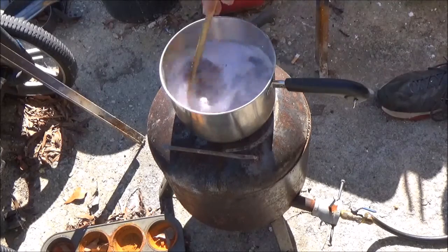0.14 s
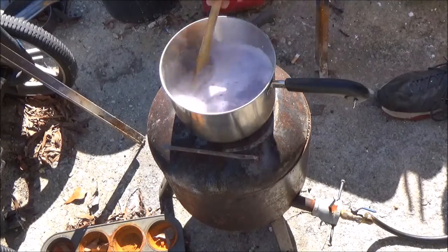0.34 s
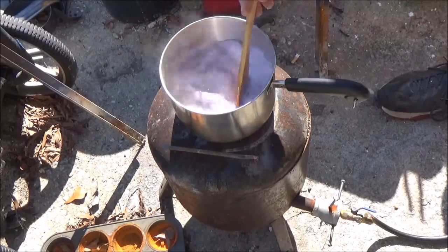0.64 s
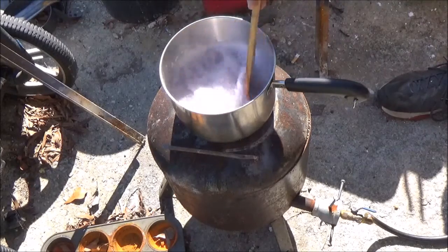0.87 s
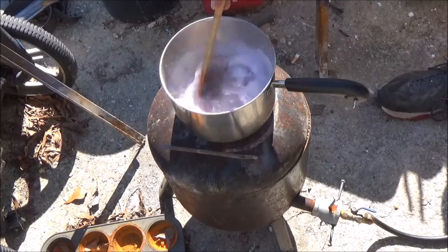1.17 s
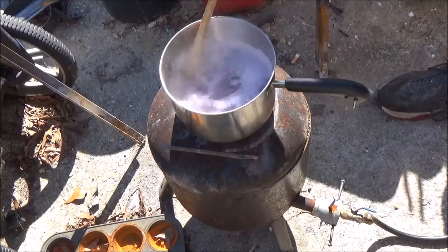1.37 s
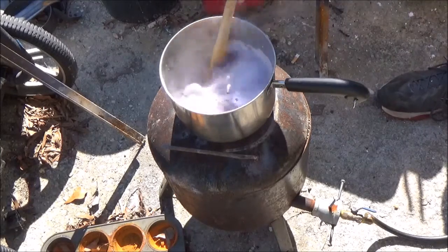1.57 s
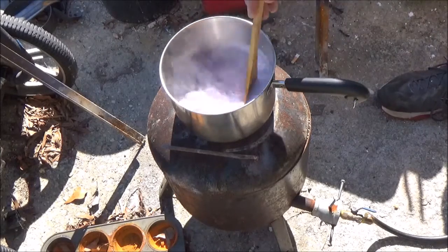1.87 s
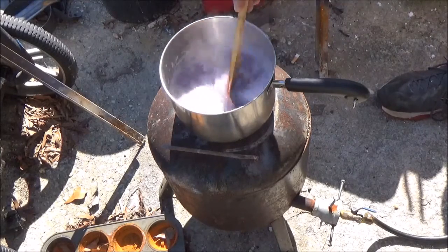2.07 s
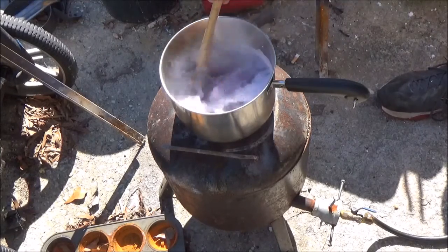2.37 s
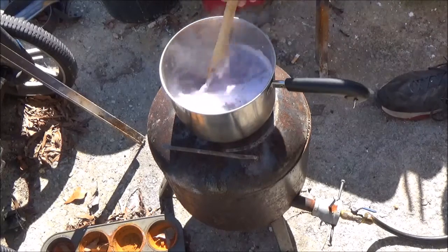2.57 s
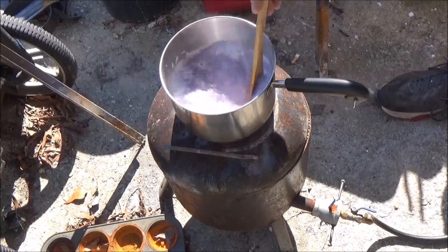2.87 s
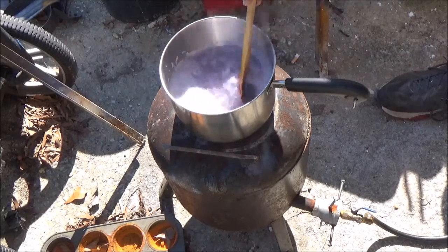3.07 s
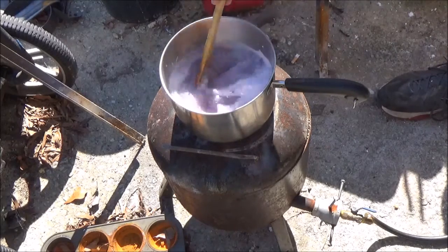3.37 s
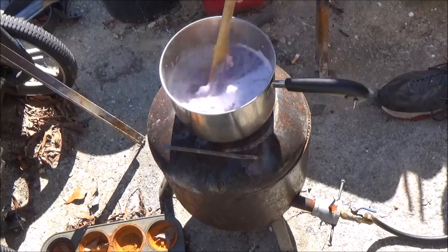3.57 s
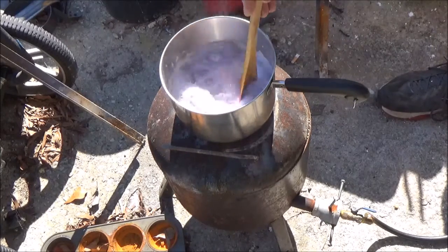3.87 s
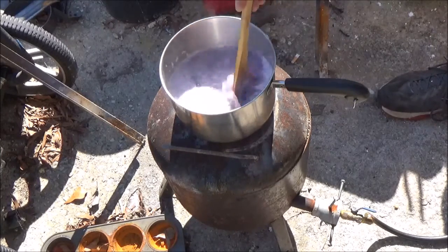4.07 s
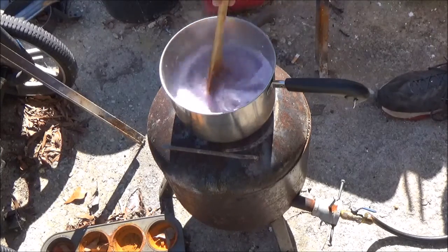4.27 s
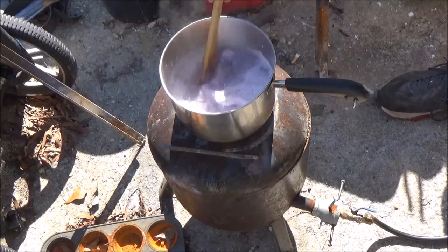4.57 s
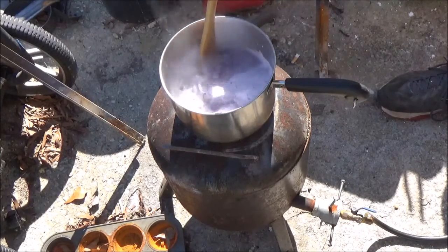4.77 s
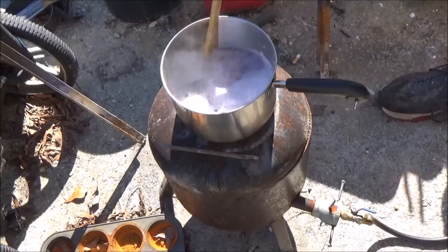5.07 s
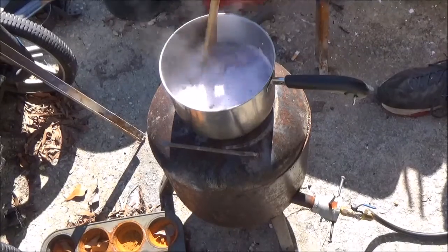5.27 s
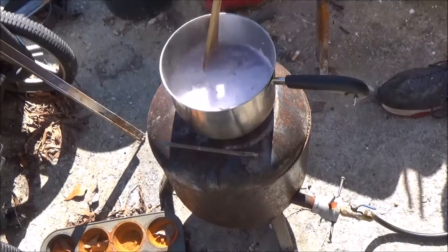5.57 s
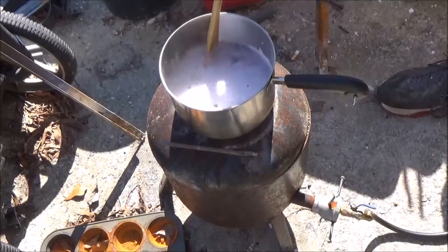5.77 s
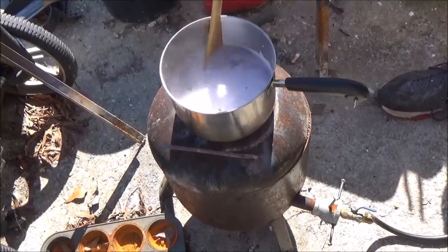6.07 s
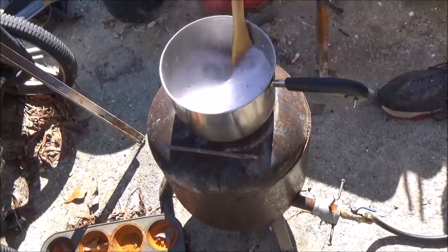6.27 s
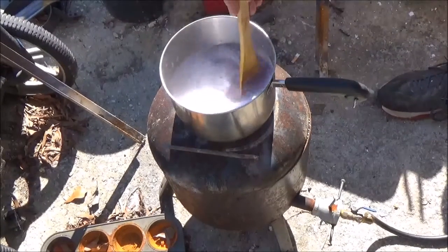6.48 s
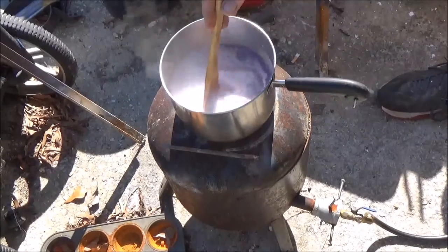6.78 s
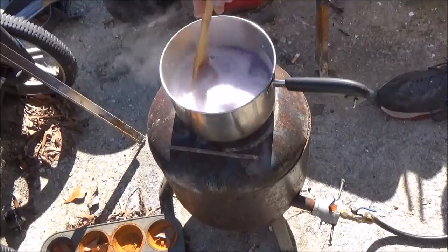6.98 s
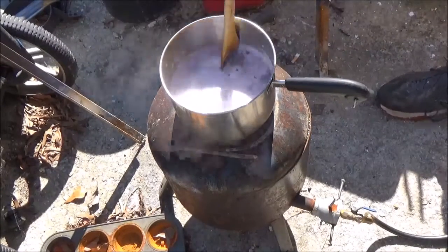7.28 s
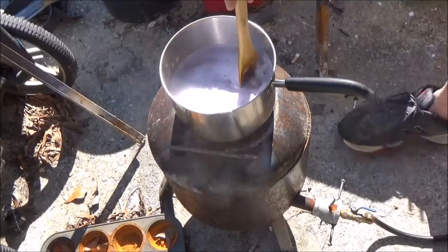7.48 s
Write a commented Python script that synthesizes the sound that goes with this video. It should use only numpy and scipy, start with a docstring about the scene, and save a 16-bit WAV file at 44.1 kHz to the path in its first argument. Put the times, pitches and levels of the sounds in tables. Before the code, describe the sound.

Throughout about 7.6 seconds, a propane burner roars close by in an open yard, slightly to the right. The flame rings its steel drum with a hollow, noisy tone a little above 1 kHz, fluttering and surging in quick uneven puffs, over steady low rumble and a patchy gas hiss. From 1.3 s a wooden spoon ticks lightly on the full saucepan, with a firmer, short damped knock at 2.6 s and small taps at 2.9 and 3.3 s. Narrow, soft stirring swishes rise around 3.8 and 4.8 s, while the flame spits brightly between 4 and 5.5 s. Sharp plastic clicks of the handheld camera crack at about 5.05 and 5.27 s. Spoon taps follow at 5.5 and 5.8 s. After 6 s, grainy shoe scuffs on concrete blend with longer stirring strokes; a crisp spoon tick lands at 7.2 s, a weaker one at 7.5 s, the roar still going.

```python
"""Heard close by in a yard: a propane burner roars under a saucepan throughout. Its fluttering flame rings
the steel drum around it as filtered noise and single puffs, over noise rumbles and the gas jet's hiss.
From about 1.3 s a wooden spoon ticks on the pan, with decaying sine knocks, and stirs in narrow noise strokes.
At 5 s the case of the hand-held camera clicks in short noise cracks; after 6 s a shoe shuffles on the
concrete in grainy noise swells."""
import sys
import numpy as np
from scipy import signal
from scipy.fft import rfft, irfft, next_fast_len
from scipy.io import wavfile
from scipy.ndimage import uniform_filter1d, map_coordinates

SR = 44100
rng = np.random.default_rng(int(sys.argv[2]) if len(sys.argv) > 2 else 0)


def store_pcm(level_fs):
    """Save levels as 16-bit WAV."""
    pcm = np.round(np.clip(level_fs, -1, 1) * 32767).astype(np.int16)
    wavfile.write(sys.argv[1], SR, np.atleast_2d(pcm).T)


N = 336483


def amp(db):
    """Decibels to gain."""
    return 10 ** (np.asarray(db) / 20)


def unit(x):
    """Scaled to rms 1."""
    return x / np.sqrt(np.mean(x ** 2) + 1e-20)


def along(points, hz):
    """(frequency [Hz], value) points read on a log frequency axis."""
    f, v = np.transpose(points)
    return np.interp(np.log(hz + 1), np.log(f + 1), v)


def curves(rows):
    """One value per sample for each column after the time."""
    seconds, *columns = np.transpose(rows)
    return [np.interp(np.arange(N) / SR, seconds, column) for column in columns]


def wobble(rate):
    """A smooth random curve of rms 1, rate knots a second."""
    knots = rng.standard_normal(int(N * rate / SR) + 4)
    return unit(map_coordinates(knots, [np.arange(N) * rate / SR]))


def filtered(x, response):
    """x times a complex response of frequency."""
    size = next_fast_len(N + SR // 2)
    spectrum = rfft(x, size) * response(np.fft.rfftfreq(size, 1 / SR))
    return irfft(spectrum, size)[..., :N]


def colour(points):
    """The response of a (frequency [Hz], level [dB]) spectrum."""
    return lambda hz: amp(along(points, hz))


def ringing(modes):
    """The causal response of (frequency [Hz], width [Hz], level [dB]) resonances, alternating in sign."""
    def response(hz):
        total = 0
        for k, (centre, width, db) in enumerate(modes):
            damping = 1j * hz * width
            total = total + (-1) ** k * amp(db) * damping / (centre * centre - hz * hz + damping)
        return total
    return response


def leaning(hz):
    """Left and right gains that place a sound, as the burner, a little to the right of the microphones."""
    # side lean: (frequency [Hz], left minus right [dB])
    side_lean = [(60, -.3), (150, -.6), (300, -1.8), (700, -3.1), (1200, -3.8), (2200, -2.8), (4500, -2.3),
                 (9000, -1.2)]
    return amp(np.outer([.5, -.5], along(side_lean, hz)))


def turbulence(response, drive):
    """Stereo noise of rms 1, shaken by drive, coloured by a response and leaning to the right."""
    # how alike the two microphones hear: (frequency [Hz], left-right likeness [-1 to 1])
    likeness = [(40, 0.98), (100, 0.96), (220, 0.94), (430, 0.75), (820, 0.84), (1200, 0.96), (1700, 0.81),
                (3000, 0.73), (5000, 0.83), (11000, 0.65)]

    def spread(hz):
        turn = np.arccos(np.clip(along(likeness, hz), -1, 1)) / 2
        return response(hz) * np.array([np.cos(turn), np.sin(turn)])
    mid, side = filtered(drive * rng.standard_normal((2, N)), spread)
    return unit(filtered(np.array([mid + side, mid - side]), leaning))


def steadied(x, span):
    """x with its slow swells evened out over about span seconds and its fast flutter kept."""
    size = max(int(span * SR), 2)
    power = uniform_filter1d(uniform_filter1d(np.mean(x ** 2, 0), size), size)
    return x / np.sqrt(np.abs(power) + 1e-9)


def add(track, s, sound):
    """Mix a sound into a track at time s."""
    part = track[..., max(round(s * SR), 0):][..., :sound.shape[-1]]
    part += sound[..., :part.shape[-1]]


def burner():
    """One flutter shakes every layer but the deepest rumble; surges make it louder, brighter, a little higher."""
    # slow treble levels before trims: (time [s], bright edge level [dB], jet hiss level [dB])
    treble_levels = [(0.0, -37.5, -50), (1.2, -35.5, -46.5), (2.88, -35.5, -49.5), (3.12, -32.5, -44.5),
                     (3.6, -36.5, -51.5), (4.08, -34, -46), (4.56, -35, -50.5), (5.04, -34.5, -44),
                     (5.76, -33.6, -49.5), (6.48, -37, -47), (7.2, -34.5, -53), (7.6, -35.5, -49)]
    # slow pitch drift, of which only the ratio to its mean counts: (time [s], frequency [Hz])
    pitch_drift = [(0.0, 1169.0), (1.44, 1175), (1.92, 1192), (3.84, 1173), (5.04, 1205), (7.6, 1148)]
    # shift between the ears as the hand-held camera moves, heard about its mean:
    # (time [s], left minus right [dB])
    ear_shift = [(0.0, -4.2), (3.84, -4.3), (4.32, -1.2), (5.28, -6.6), (6.0, -3.6), (6.96, -0.5),
                 (7.6, -5.1)]
    edge_follows, jet_follows = 0.45, 0.12  # dB gained per dB of surge
    rise_hz_per_db = 4.0  # a surge heats the gas and lifts the roar's pitch

    strength_db, surge_db = flame()
    shake = flutter(rate=260, life=0.0082)
    edge_db, jet_db = curves(treble_levels)
    drum = roar(shake, strength_db, curves(pitch_drift)[0] + rise_hz_per_db * surge_db)
    edge = bright_edge(shake, edge_db + edge_follows * surge_db)
    pan_db, = curves(ear_shift)
    sway = amp(np.outer([.5, -.5], pan_db - np.mean(pan_db)))
    hiss = gas_jet(shake, jet_db + jet_follows * surge_db)
    return sway * (drum + edge) + hiss + rumble(shake)


def flame():
    """The flame wavers at random in strength; a surge is its rise above the mean around it, both in dB."""
    # flame strength heard in the drum's main resonance, before wavering and trim: (time [s], level [dB])
    strength_levels = [(0.0, -21), (0.24, -18.5), (0.4, -24), (0.56, -19.4), (0.64, -23), (1.12, -19),
                       (1.6, -22), (1.68, -20), (2.4, -20.5), (2.72, -21.5), (3.04, -20), (4.08, -19.5),
                       (4.56, -24), (4.64, -20), (5.36, -25), (5.6, -22.5), (5.84, -24), (6.08, -21),
                       (6.88, -22.5), (7.12, -22.5), (7.2, -19), (7.6, -20.2)]
    waver_db, surge_s = 0.5, 0.786  # rms depth of the wavering; span of the mean
    strength_db = curves(strength_levels)[0] + waver_db * wobble(rate=9)
    return strength_db, strength_db - uniform_filter1d(strength_db, int(surge_s * SR))


def flutter(rate, life):
    """Flame pockets catch at random, rate a second: each flares at once and dies away. Mean 0, rms 1."""
    pops = (rng.random(N) < rate / SR) * rng.uniform(.4, 1, N)
    flares = signal.lfilter([1], [1, -np.exp(-1 / (life * SR))], pops)
    return unit(flares - flares.mean())


def roar(shake, strength_db, centre_hz):
    """Combustion noise and single puffs ring the drum; hot gas inside makes the noise drift in pitch."""
    # drum and gap under the pan: (frequency [Hz], width [Hz], relative level [dB])
    drum_modes = [(774, 45, -24), (997.5, 64.5, -14.5), (1080, 76.6, -12.5), (1189, 48.6, -3.5),
                  (1351, 160, -18.5), (1354, 67, -18.5)]
    # the drum's quick answer to one puff: (frequency [Hz], width [Hz], relative level [dB])
    puff_modes = [(1180, 170, 0)]
    # strong puffs of the flame: (time [s], relative level [dB])
    puff_times = [(0.54, -9), (0.569, -12), (0.754, -10), (1.095, -8), (1.285, -10), (1.377, -11),
                  (1.872, -8), (3.065, -9), (3.116, -9), (3.259, -7), (3.774, -12), (3.864, -7),
                  (3.959, -9), (4.111, -9), (4.4, -11), (4.717, -10), (4.87, -8), (4.968, -10),
                  (5.005, -11), (5.367, -12), (5.795, -11), (6.258, -8), (6.628, -9), (7.407, -7),
                  (7.459, -7), (7.504, -12), (7.537, -7)]
    shake_db, throb_db = 1.37, 1.24  # rms depths of the shared flutter and the roar's own throb
    dip_db, dip_s = 8, 0.025

    drive = amp(shake_db * shake + throb_db * wobble(rate=45))
    ring = turbulence(ringing(drum_modes), drive)
    # reading the noise faster or slower moves its pitch
    clock = np.cumsum(centre_hz / centre_hz.mean())
    ring = np.array([map_coordinates(side, [clock], mode="mirror") for side in ring])
    ring = steadied(ring, span=0.1)  # slower swells follow the flame's strength

    kicks, dip = np.zeros(N), np.zeros(N)
    for s, db in puff_times:
        add(kicks, s - .002, amp([db + 42]))
        # the roar dips briefly around each puff, so that it stands out
        add(dip, s - .014, np.hanning(int(dip_s * SR)))
    # passing the resonance three times makes a puff swell over a few cycles
    answer = ringing(puff_modes)
    puffs = filtered(kicks, lambda hz: answer(hz) ** 3 * leaning(hz))
    return amp(strength_db + 0.43 - dip_db * dip) * ring + puffs


def bright_edge(shake, level_db):
    """The flame rings the upper resonances, which sag and blur for a while; now and then it spits."""
    # upper resonances of drum and gap: (frequency [Hz], width [Hz], relative level [dB])
    edge_modes = [(1773, 42, -10), (1956, 45.4, 1.5), (2301, 81, -7), (3328, 121, -8), (3835, 60, -21.5),
                  (4330, 63, -12), (4630, 110, -9), (5754, 40, -13), (6960, 110, -26), (7930, 150, -25.5),
                  (10600, 130, -24)]
    # the same region while sagged: (frequency [Hz], width [Hz], relative level [dB])
    sagged_modes = [(1820, 70, -5), (1987, 22, 7), (2167, 110, -4.5), (2285, 85, -2.5), (3336, 118, -7.5),
                    (4200, 470, -14.5), (4454, 260, -8.5), (5520, 120, -15.5)]
    # how far they sag: (time [s], share [0-1])
    sag_share = [(0, 0.01), (3.5, 0.2), (4.1, 0.7), (4.8, 0.7), (5.6, 0.98), (6.6, 0.85), (7.2, 0.4),
                 (7.4, .3), (7.63, 0.8)]
    # bright spits of the flame: (time [s], added level [dB])
    spit_times = [(.706, -39), (1.961, -35), (3.603, -38), (3.979, -27), (4.106, -27), (4.351, -29),
                  (4.627, -29), (5.01, -27.5), (5.343, -43), (5.5365, -29)]

    sag = np.clip(curves(sag_share)[0], 0, 1)
    flicker = amp(2.0 * shake + 1.74 * flutter(rate=220, life=0.0067))
    plain = np.sqrt(1 - sag) * turbulence(ringing(edge_modes), flicker)
    sagged = np.sqrt(sag) * turbulence(ringing(sagged_modes), flicker)
    spits, t = np.zeros(N), np.arange(SR // 10) / SR
    for s, db in spit_times:
        add(spits, s, amp(db - 60 * t / 0.083))
    return (amp(level_db + 0.14) + spits) * steadied(plain + sagged, span=0.11)


def stirring():
    """The spoon drags, the liquid swirls: each stroke swells rough noise in one resonance of pan and liquid."""
    # strokes before roughening: (time [s], half length [s], frequency [Hz], width [Hz], level [dB])
    strokes = [(1.337, .09, 3120, 200, -46), (2.47, 0.036, 454, 70, -33), (2.894, 0.018, 3900, 120, -50),
               (3.803, 0.14, 3140, 200, -41), (3.902, 0.15, 2530, 180, -48),
               (4.801, 0.18, 1330, 120, -35.5), (5.685, 0.25, 3710, 130, -47.5), (6.2, 0.033, 610, 90, -33),
               (6.388, 0.12, 2640, 220, -43), (6.755, 0.14, 1560, 110, -37),
               (6.979, 0.26, 1415, 110, -33.5), (6.997, 0.25, 440, 80, -39.5), (7.15, 0.11, 2820, 200, -44)]
    track, t = np.zeros(N), np.arange(-SR // 2, SR // 2) / SR
    for s, half, hz, width, db in strokes:
        b, a = signal.iirpeak(hz, hz / width, SR)
        band = signal.lfilter(b, a, rng.standard_normal(len(t)))
        swell = np.exp(-2 * (t / half) ** 2)
        add(track, s - .5, amp(db) * swell * unit(band))
    roughness = amp(2.1 * wobble(rate=44))
    return track * roughness * amp([[-.8], [.8]])  # a little to the right


def snaps(rows, spectrum, t60, tail_db, tail_t60, channels):
    """Short cracks set by peak dB, alike at both ears (1 channel) or unrelated (2), each with a faint scatter."""
    track, t = np.zeros((2, N)), np.arange(SR // 8) / SR
    lead = SR // 100  # silence ahead, room for the filter to spread
    gain = colour(spectrum)(np.fft.rfftfreq(len(t) + lead, 1 / SR))
    for s, db, *_ in rows:
        crack = amp(-60 * t / t60) * rng.standard_normal((channels, len(t)))
        scatter = amp(tail_db - 60 * t / tail_t60) * rng.standard_normal((2, len(t)))
        padded = np.pad(crack + scatter, ((0, 0), (lead, 0)))
        snap = irfft(rfft(padded) * gain)
        add(track, s - lead / SR, amp(db) * snap / np.abs(snap).max())
    return track


def spoon():
    """Wood ticks on steel; firmer contacts knock the liquid-damped pan. A shoe's scuff near the end sounds
    alike."""
    # spoon against the pan, and at 7.242 s a shoe scuffing the concrete, played alike, before trim and side
    # lean: (time [s], tick peak [dB], knock level [dB])
    contacts = [(1.258, -19, -34), (1.321, -23, -49), (1.7151, -33, -41), (2.2958, -24, -43),
                (2.614, -11, -18), (2.949, -25, -45), (3.2852, -22, -33), (4.353, -21, -57),
                (5.536, -20, -35), (5.8157, -24, -31), (7.242, -13, -40), (7.471, -23, -58)]
    # the full pan: (frequency [Hz], relative level [dB], 60 dB decay [s])
    pan_modes = [(317, -30, 0.09), (396, 3.5, 0.12), (579, 3.5, 0.085), (566, -19, 0.044), (680, 9, 0.063),
                 (736, 3.5, 0.1)]
    # colour of the ticks: (frequency [Hz], relative level [dB])
    tick_colour = [(300, -16), (1500, -2), (3000, 2), (5000, 2), (6100, 3), (7000, -2), (7900, -10),
                   (9200, -2.5), (11500, -16)]

    knocks, t = np.zeros(N), np.arange(SR // 4) / SR
    for s, _, knock_db in contacts:
        ring = np.zeros(len(t))
        for hz, db, t60 in pan_modes:
            decay = amp(db + rng.normal(0, 1.5) - 60 * t / t60)  # no two knocks balance alike
            ring += decay * np.sin(2 * np.pi * hz * t)
        add(knocks, s, amp(knock_db - 9.5) * ring)
    ticks = snaps(contacts, tick_colour, t60=0.0093, tail_db=-13, tail_t60=0.13, channels=1)
    return (knocks + ticks) * amp([[-1.1], [1.1]])  # a little to the right


def clicks():
    """The camera's case clicks in the hand, differently at each microphone port."""
    # case clicks: (time [s], peak level [dB])
    click_times = [(5.0395, -21), (5.0525, -5), (5.064, -4.5), (5.2248, -18), (5.2688, -7), (5.277, -23)]
    # colour of the clicks: (frequency [Hz], relative level [dB])
    click_colour = [(200, -20), (1200, 3), (2900, 5.5), (4400, 2), (5300, -1), (6500, -4.5), (8200, -4),
                    (10000, 1), (11500, -15)]
    return snaps(click_times, click_colour, t60=0.014, tail_db=-11.5, tail_t60=0.049, channels=2)


def shuffle():
    """Grainy noise swells of shoe and clothing as a sole drags over concrete."""
    # swells: (time [s], half length [s], level [dB])
    drags = [(6.346, 0.051, -34), (6.545, 0.26, -34.5), (6.955, 0.3, -36), (7.216, 0.077, -34.5)]
    # colour of the grit: (frequency [Hz], relative level [dB])
    grit_colour = [(200, -6), (450, -1), (800, 13.5), (1550, 4), (2700, 1), (3300, 7), (3950, 1),
                   (4400, 8.5), (5100, -8), (6500, -8), (8500, -4.5), (11000, -8)]
    t = np.arange(N) / SR
    swell = sum(amp(db) * np.exp(-2 * ((t - s) / half) ** 2) for s, half, db in drags)
    return swell * turbulence(colour(grit_colour), amp(1.7 * wobble(rate=330)))


def patchy(x, depth_db):
    """Eddies make each band of a hiss swell and fade on its own."""
    z = signal.stft(x, nperseg=512)[2]
    field = rng.standard_normal(z.shape[1:])
    field = uniform_filter1d(field, size=6, axis=0)  # across frequency
    field = uniform_filter1d(field, size=18, axis=1)  # across time
    return signal.istft(z * amp(depth_db * unit(field)), nperseg=512)[1][:, :N]


def gas_jet(shake, level_db):
    """Gas hisses from the nozzle as noise, in eddies."""
    # colour of the hiss: (frequency [Hz], relative level [dB])
    jet_colour = [(500, -5), (1500, 23.5), (2500, -11), (3800, -2), (5000, -2), (5500, 6), (6300, 8),
                  (8300, 11), (9400, 7), (10600, 7.5), (11200, -40)]
    hiss = turbulence(colour(jet_colour), amp(1.8 * shake + 1.4 * flutter(rate=57, life=0.005)))
    return amp(level_db + 2.4) * steadied(patchy(hiss, depth_db=3.6), span=0.6)


def rumble(shake):
    """A steady rumble shaken by the flame, over a deeper one that rolls slowly and eases off."""
    # colour of the steady rumble: (frequency [Hz], relative level [dB])
    body_colour = [(12, -32), (25, -22), (42, -4.5), (62, -11), (95, -17.5), (125, 0), (155, -0.5),
                   (183, 2.5), (220, -5.5), (280, -6.5), (335, -3), (430, -11.5), (700, -9.5), (3000, -44)]
    # colour of the deepest rumble: (frequency [Hz], relative level [dB])
    deep_colour = [(12, -40), (25, -26), (40, -25), (62, -8), (87, 3.5), (115, -0.5), (160, -21),
                   (400, -57.5)]
    # the deepest rumble before a slight trim: (time [s], level [dB])
    deep_levels = [(0.0, -38.5), (2.64, -39), (4.08, -41.7), (7.6, -45)]
    body = steadied(turbulence(colour(body_colour), amp(1.68 * shake)), span=0.96)
    deep = turbulence(colour(deep_colour), amp(0.72 * wobble(rate=18)))
    return amp(-34) * body + amp(curves(deep_levels)[0] + 0.1) * deep


def scene():
    """Everything in the open air."""
    return burner() + stirring() + spoon() + clicks() + shuffle()


def record(dry):
    """Almost nothing is heard above 11.2 kHz, where the level drops steeply."""
    top_hz = 11200
    return filtered(dry, lambda hz: 1 / np.sqrt(1 + (hz / top_hz) ** 200))


dry = scene()
out = record(dry)
store_pcm(out)
```